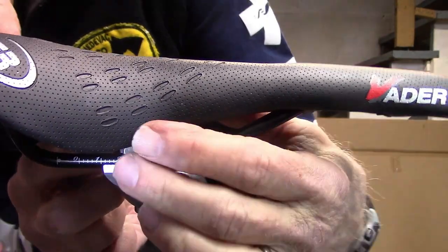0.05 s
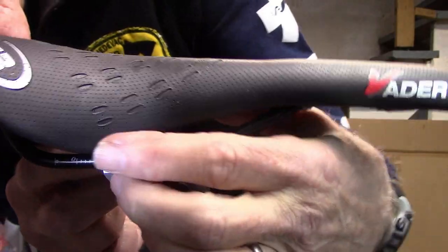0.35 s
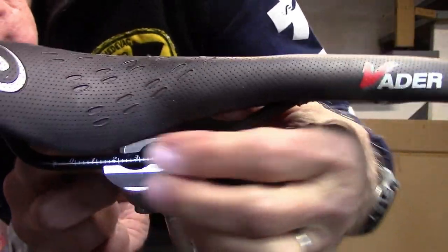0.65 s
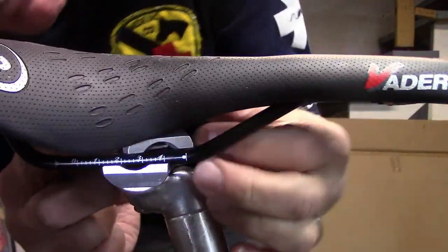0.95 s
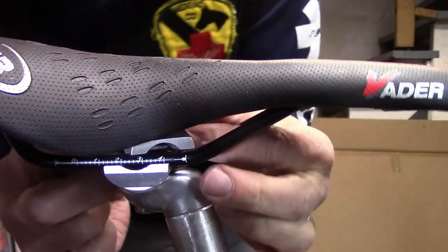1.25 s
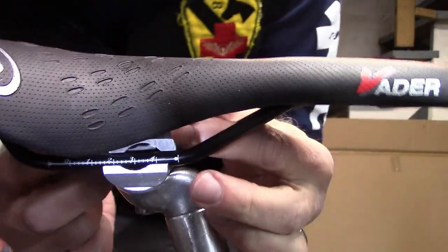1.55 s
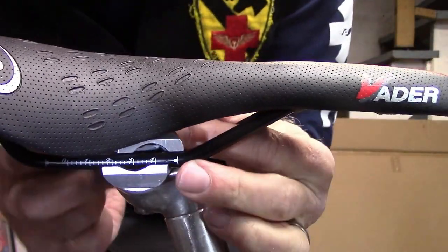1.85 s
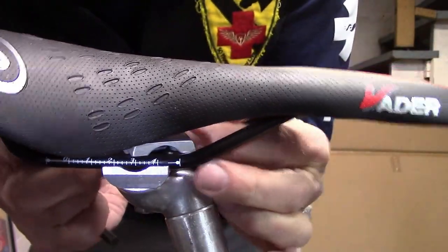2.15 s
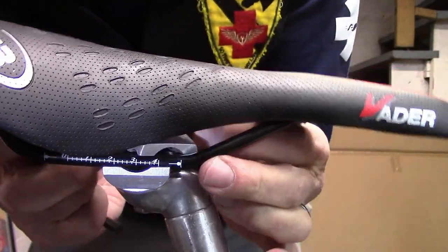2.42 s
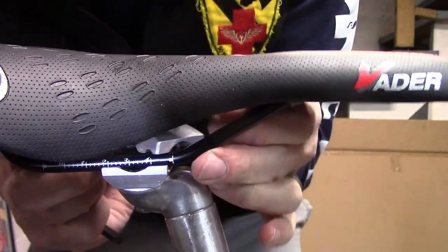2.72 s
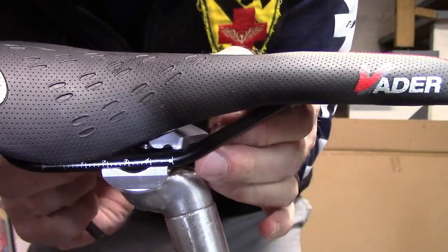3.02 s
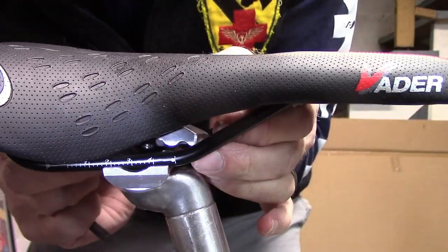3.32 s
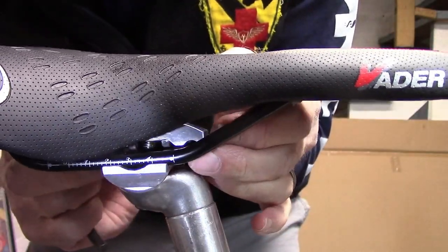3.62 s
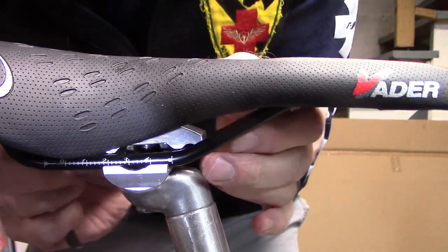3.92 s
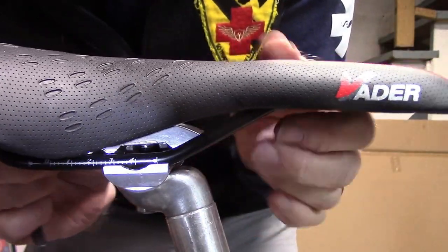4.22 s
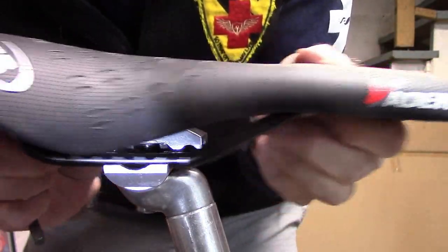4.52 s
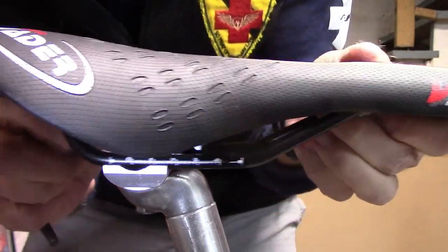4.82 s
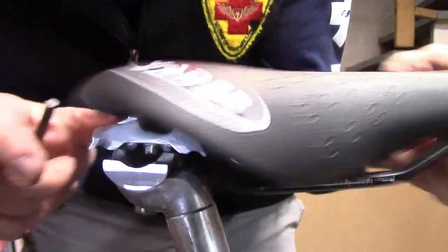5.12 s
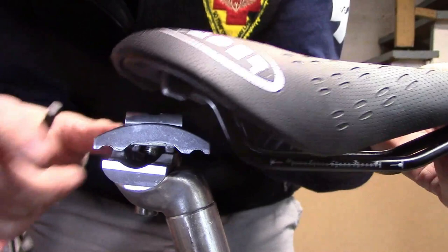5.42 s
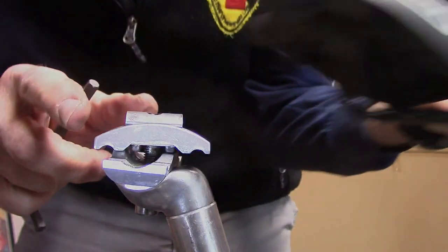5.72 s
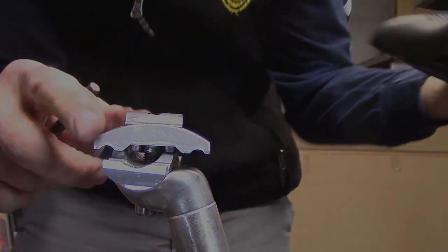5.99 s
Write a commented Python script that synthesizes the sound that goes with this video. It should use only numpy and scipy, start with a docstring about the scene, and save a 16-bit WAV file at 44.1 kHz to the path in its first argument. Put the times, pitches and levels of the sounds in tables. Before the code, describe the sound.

Hands work a bicycle saddle loose from its clamp, close to the microphone in a small workshop. The steel rails give light, irregular clicks and knocks, a loose bolt ticks, and fingers rub softly with faint creaks. Near the end the rails scrape out and the freed metal plate clatters brightly onto the seatpost. A fan runs quietly throughout.

```python
"""Working a bicycle saddle loose

In a small workshop, hands work a saddle out of its seatpost clamp. Its steel rails knock in the clamp,
the loose bolt ticks and fingers rub the saddle. Then the rails scrape out and the freed top plate
clatters down on the post. Each hit is a short pulse that sets metal ringing; each rub is many tiny
slips over a hiss. A fan runs steadily behind."""
import sys
import numpy as np
from scipy import signal
from scipy.fft import rfft, irfft
from scipy.io import wavfile
from scipy.ndimage import uniform_filter1d, minimum_filter1d

SR = 44100
rng = np.random.default_rng(int(sys.argv[2]) if len(sys.argv) > 2 else 0)


def file_out(sig):
    """Save sig as 16-bit WAV at sys.argv[1]."""
    # one column per channel
    cols = np.atleast_2d(sig).T
    # limit, then scale
    lim = np.clip(cols, -1, 1)
    pcm = np.round(lim * 32767).astype(np.int16)
    wavfile.write(sys.argv[1], SR, pcm)


N = 266849
TIME = np.arange(N) / SR

# Pitches the gripped rails favour or weaken. Each row: pitch in Hz, width in Hz, boost or cut in dB.
RAIL_RESONANCES = [(900, 200, -3.5), (1183, 240, 6), (1940, 360, 4.5), (2620, 270, 2), (3264, 150, 3.5),
                   (3520, 520, -2), (4320, 580, 3.5)]
# How strongly skin and sleeve rub the saddle. Each row: time in seconds, relative level in dB.
HAND_EFFORT = [(0, -68), (.35, -57), (.95, -52.5), (1.4, -54.5), (1.7, -57.5), (2.4, -54), (2.85, -59.5),
               (4.3, -56), (4.6, -50.5), (4.72, -57), (5.25, -53), (5.45, -65), (6.05, -56)]


def rail_knocks():
    """The rails knock in the clamp, some hard and some faintly, and the saddle's shell bumps the post."""
    # Each row: start in seconds, ring level in dB, ring pitch in Hz, ring width in Hz,
    # shell thud in dB, steel crack in dB, treble limit in Hz. Levels are relative.
    knocks = [(0.3955, 3.5, 1850, 2000, 6, -5.5, 8400), (0.592, 11, 2050, 800, -4, -15.5, 6800),
              (1.2878, 4, 2180, 1650, -5, -17, 10600), (1.53, 15, 2270, 1900, 9, -1, 7700),
              (1.8325, 18, 2250, 1210, 3.5, -4.5, 5300), (2.1156, 17.5, 2090, 1150, -10, -7, 8140),
              (2.5029, 14, 1960, 1200, -7, -5, 7800), (2.6028, 9, 2160, 1300, -13, -6.5, 6900),
              (2.60385, 12.5, 2180, 1320, 2, -18, 6800), (3.1472, 14, 2010, 1270, 0, -14, 4300),
              (3.3782, 7.5, 2470, 2170, -1, -7, 7150)]
    # Bumps are nearly all thud. Each row: start in seconds, relative thud level in dB.
    shell_bumps = [(0.5244, 0), (0.8053, -2), (3.0654, 5.5), (4.25, -4.5), (4.3721, -4.5), (4.5544, -1.5),
                   (4.7082, 7), (5.0081, 5.5)]
    # Faint knocks of the rails in the clamp are mostly ring.
    # Each row: start in seconds, relative ring level in dB, pitch in Hz.
    faint_knocks = [(0.82, -10, 2300), (0.9256, -6.5, 1700), (0.95, -11, 1490), (1.004, -10.5, 1600),
                    (1.058, -13, 1900), (1.1355, -6, 1990), (1.2549, -1, 2550), (1.3, -5, 2300),
                    (1.3439, -7, 1900), (1.3652, -9.5, 2700), (1.444, -8.5, 2600), (1.4625, -6, 1780),
                    (2.0879, 4.5, 2200), (2.5207, 3, 1910), (2.6974, -3.5, 1830), (2.9222, -3, 1840),
                    (3.6668, 0.5, 2220), (3.6896, -5, 1750), (3.8214, -1.5, 2500), (4.8898, -2, 2940),
                    (4.9779, 0.5, 2100), (5.3178, -8, 3060)]
    bumps = [(start, db - 21.5, 1200, 1320, db, db - 41, 2600) for start, db in shell_bumps]
    faint = [(start, db, hz, 1380, db - 6, db - 20, 5360) for start, db, hz in faint_knocks]
    rows = knocks + bumps + faint
    return amp(-4) * play_hits(rows, RAIL_RESONANCES, smear_s=0.00094, shiver_db=-4.5,
                               fade_s=0.034, dull_hz=8200)


def bolt_ticks():
    """The loose bolt ticks in its seat. It is small and hard, so it sounds bright."""
    # Each row: start in seconds, ring level in dB, ring pitch in Hz, ring width in Hz,
    # thud in dB, crack in dB. Levels are relative.
    ticks = [(1.123, -16, 7400, 3000, -27, -27.5), (2.1298, 2.5, 11940, 800, -9, -18.5),
             (2.286, -27, 7160, 1200, -15.5, -34), (2.5417, -4, 11850, 700, -22, -20.5),
             (3.3, -27, 10100, 1900, -39, -44), (3.378, -10, 11600, 1200, -35, -32),
             (5.2261, -8.5, 7710, 1400, -35, -28.5), (5.2621, -6, 11000, 1800, -24, -21),
             (5.2630, -4, 14100, 250, -28, -23)]
    treble_hz = 14300
    rows = [(*tick, treble_hz) for tick in ticks]
    return amp(2.5) * play_hits(rows, RAIL_RESONANCES, smear_s=0.00088, shiver_db=-3,
                                fade_s=0.022, dull_hz=10000)


def plate_clatter():
    """The freed plate falls on the post and bounces, ringing with no hand to quiet it. One jolt also sets the
    bolt ringing high, near 11.5 and 14 kHz."""
    # Each row: start in seconds, ring level in dB, ring pitch in Hz, ring width in Hz, # thud in dB, crack in
    # dB, treble limit in Hz. Levels are relative. # The rows at 5.0890 and 5.0905 s are the bolt, set ringing
    # by the falling plate.
    strikes = [(5.0597, 28, 3515, 560, 5.5, 16.5, 10000), (5.0650, 19, 5600, 900, 12, 19, 11700),
               (5.0695, 20, 3480, 500, 9.5, 10.5, 10000), (5.0890, 34, 11480, 450, 6.5, 12, 11500),
               (5.0905, 15, 14100, 250, -7, 3, 14500), (5.1004, 26.5, 5700, 800, 2.5, 4, 7980),
               (5.1022, 20, 2280, 2200, 1.5, 3.5, 8000), (5.1116, 8, 1680, 1700, -12.5, -6.5, 12530),
               (5.1421, 3, 2250, 900, 0, -4, 11600)]
    # The tone of plate on post. Each row: pitch in Hz, width in Hz, boost or cut in dB.
    post_resonances = [(286, 76, 8), (607, 130, 8.5), (920, 320, -5), (4400, 600, -2)]
    hits = play_hits(strikes, post_resonances, smear_s=0.0016, shiver_db=-2.5,
                     fade_s=0.077, dull_hz=9000)
    return ring_plate(amp(-4.5) * hits, ring_db=-14.5, freedom=0.87)


def ring_plate(hits, ring_db, freedom):
    """Adds the plate's ring to the hits. Freedom is the share of its ringing time that it keeps."""
    # Each row: pitch in Hz, relative level in dB, seconds to fade by 60 dB when fully free.
    plate_tones = [(596, 1, 0.089), (1260, 2.5, 0.08), (1550, -1, 0.09), (1900, 1.5, 0.0784),
                   (2260, -9.5, 0.1), (2560, -2, 0.11), (3480, -1.5, 0.111), (3693, -4, 0.1),
                   (4290, 1.5, 0.13), (5060, -4, 0.07), (5735, -10, 0.045), (6270, -2, 0.1),
                   (8600, -3.5, 0.08), (11480, 7, 0.018), (14100, 2, 0.11)]
    t = np.arange(SR // 2) / SR
    ring = sum(amp(db) * 10 ** (-3 * t / (fade_s * freedom)) * np.sin(2 * np.pi * hz * t)
               for hz, db, fade_s in plate_tones)
    return hits + amp(ring_db) * signal.oaconvolve(hits, ring / np.linalg.norm(ring))[:N]


def play_hits(rows, body, smear_s, shiver_db, fade_s, dull_hz, size=2048):
    """Plays a list of hits on one body. Each is slightly smeared and gets its own shiver."""
    out = np.zeros(N)
    lead = 64  # samples of room for a soft start
    smear = bending_delay(np.fft.rfftfreq(size, 1 / SR), smear_s)
    for start, *settings in rows:
        pulse = irfft(rfft(hit(*settings, body, size)) * smear)
        pulse = np.roll(pulse, lead) * signal.windows.tukey(size, lead / size)
        add(out, start - lead / SR, signal.fftconvolve(pulse, shiver(shiver_db, fade_s, dull_hz)))
    return out


def hit(ring_db, ring_hz, ring_width, thud_db, crack_db, treble_hz, body, size):
    """One hit: a short ring, the shell's thud, a crack of steel and the thin snap of first touch."""
    # Small steel parts that every hit shakes. Each row: pitch in Hz, width in Hz, relative level in dB.
    steel_parts = [(3210, 5800, 2.5), (4390, 490, -10), (5680, 710, 7.5), (7100, 2010, 0), (8240, 310, 6),
                   (9570, 400, 3.5), (11200, 1100, -1), (11850, 330, -1), (14100, 240, -7)]
    f = abs(np.fft.fftfreq(size, 1 / SR))
    ring = amp(ring_db) * resonance(f, ring_hz, ring_width) ** 0.89
    bass_loss = f / np.hypot(f, 232)  # the small shell gives off little deep sound
    thud = amp(thud_db) * resonance(f, 570, 1180) ** 0.73 * bass_loss
    crack = amp(crack_db) * np.sqrt(summed_resonances(f, steel_parts))
    snap = amp(crack_db - 24) / np.sqrt(1 + (f / 13000) ** 12)
    power = (ring ** 2 + thud ** 2 + crack ** 2) / (1 + (f / treble_hz) ** 12) + snap ** 2
    body_tone = amp(sum(db * resonance(f, hz, width) for hz, width, db in body))
    # Each spot that is struck favours slightly different pitches.
    spot_tone = amp(np.interp(f, np.geomspace(500, SR / 2, 24), 1.3 * rng.standard_normal(24)))
    return sharpest_pulse(np.sqrt(power) * body_tone * spot_tone)


def shiver(shiver_db, fade_s, dull_hz, size=4096):
    """A click, then an uneven shiver through rails and post that fades by 60 dB in fade_s."""
    t = np.arange(size) / SR
    flicker = amp(3.1 * unit_level(uniform_filter1d(rng.standard_normal(size), size=50)))
    rise_and_fall = (1 - np.exp(-t / 0.00073)) * 10 ** (-3 * t / fade_s)
    shake = flicker * rng.standard_normal(size) * rise_and_fall
    soften = signal.butter(1, dull_hz, fs=SR)
    return (t == 0) + amp(shiver_db) * signal.lfilter(*soften, shake / np.linalg.norm(shake))


def bending_delay(f, smear_s):
    """Waves that bend the metal arrive at different times, treble first, which smears a click."""
    delay = np.interp(f, np.geomspace(300, SR / 2, 40), rng.random(40) * smear_s)
    delay /= np.sqrt(np.maximum(f / 2500, 1))  # higher waves arrive ever closer together
    return np.exp(-2j * np.pi * np.cumsum(delay) * f[1])


def rail_scrape():
    """The scrape swells until the rails slip free of their grooves, then stops."""
    # Each row: pitch in Hz, relative level in dB.
    scrape_tone = [(100, -31), (330, -0.5), (560, 5), (850, -11), (1400, -2.5), (2200, -3.5), (3100, -3),
                   (4300, -18), (5800, -13), (9500, -36), (11900, -21), (15000, -55)]
    pull = amp(-30.5) * stroke(peak_s=5.008, rise_s=0.059, fall_s=0.016)
    return friction(pull, scrape_tone, slips_per_s=330, spread_db=2, hiss_db=-8)


def hand_rub():
    """Skin and sleeve rub the saddle with a soft, low hiss."""
    # Each row: pitch in Hz, relative level in dB.
    rub_tone = [(60, -35), (200, -0.5), (420, -3.5), (900, -2), (2500, -8), (5000, -21), (11000, -32),
                (15000, -48)]
    return amp(-5.5) * friction(level(HAND_EFFORT), rub_tone, slips_per_s=280, spread_db=-2, hiss_db=6.5)


def sleeve_swishes():
    """A sleeve brushes the saddle as the hand changes grip."""
    # Each row: loudest moment in seconds, fade in and out in seconds.
    brushes = [(3.96, 0.12), (4.17, .1), (4.52, .22)]
    # Each row: pitch in Hz, relative level in dB.
    cloth_tone = [(1000, -26), (3000, 3.5), (7000, 0), (11500, -4), (14500, -23)]
    gain = amp(-65) * sum(stroke(peak_s, fade_s, fade_s) for peak_s, fade_s in brushes)
    return friction(gain, cloth_tone, slips_per_s=2200, spread_db=6, hiss_db=6)


def rail_creaks():
    """The rails slip in small jerks under the hands, and each jerk makes the metal shiver."""
    # Each row: pitch in Hz, relative level in dB.
    creak_tone = [(100, -30), (330, 4), (800, -6.5), (1400, 2.5), (2700, -6), (5000, -17.5), (12000, -27.5)]
    slips = amp(-7.5) * friction(level(HAND_EFFORT), creak_tone, slips_per_s=70, spread_db=2, hiss_db=-10)
    return signal.oaconvolve(slips, shiver(shiver_db=7, fade_s=0.05, dull_hz=5970))[:N]


def bolt_turn():
    """Fingertips drag on the bolt's ribbed head."""
    # Each row: pitch in Hz, relative level in dB.
    drag_tone = [(400, -18), (1400, 8), (2800, -5), (4200, -7), (8000, -22), (14000, -35)]
    gain = amp(-63) * stroke(peak_s=1.5, rise_s=0.57, fall_s=0.41)
    return friction(gain, drag_tone, slips_per_s=300, spread_db=0, hiss_db=-4)


def friction(gain, tone, slips_per_s, spread_db, hiss_db):
    """Sliding surfaces make tiny slips of uneven size over a smooth hiss."""
    slipping = rng.random(N) < slips_per_s / SR
    sizes = amp(spread_db * np.minimum(rng.exponential(1, N), 3.5))
    slips = unit_level(slipping * sizes * rng.choice([-1, 1], N))
    hiss = amp(hiss_db) * rng.standard_normal(N)
    return gain * unit_level(shape_tone(slips + hiss, tone))


def fan():
    """Rushing air sings in the fan's housing. Returns the centre sound and the left-right difference."""
    # The rushing air. Each row: pitch in Hz, relative level in dB.
    air_tone = [(25, -20), (60, -15.5), (105, -9), (140, -4.5), (400, -2.5), (680, -5.5), (860, -10.5),
                (1150, -5.5), (2050, -5.5), (2800, -9), (3300, -7.5), (4300, -13.5), (5900, -13.5),
                (10000, -25.5), (15000, -37.5)]
    # The housing. Each row: pitch in Hz, width in Hz, level above the air noise in dB.
    housing_resonances = [(61.3, 5.8, 6.5), (125.3, 9.8, 5.5), (350, 51, -0.5), (668, 39, 9),
                          (1048.5, 11.5, 23), (1111, 14, 11.5), (1308, 25, 11.5), (1453, 170, 6.5),
                          (1743, 14, 16.5), (1900, 16, 11.5), (1960, 14, 14.5), (2237, 14.3, 16),
                          (2600, 34, 6.5)]
    # How wide the fan sounds. Each row: pitch in Hz, level of the side against the centre in dB.
    stereo_width = [(60, -3.5), (110, -15.5), (200, -8), (380, -9), (700, -11.5), (1290, -16.5),
                    (2380, -15.5), (4400, -12), (8120, -10), (15000, -28.5)]
    f = np.fft.rfftfreq(N, 1 / SR)
    housing = np.sqrt(1 + summed_resonances(f, housing_resonances))
    tone = amp(value_at(air_tone, f)) * housing
    centre, side = (amp(-49) * unit_level(irfft(rfft(noise) * tone, N))
                    for noise in rng.standard_normal((2, N)))
    return centre, shape_tone(side, stereo_width)


def early_echoes(x):
    """The person's chest and the bench throw back two quick, dull echoes."""
    out = np.zeros(N)
    dull = signal.lfilter(*signal.butter(1, 4000, fs=SR), x)
    add(out, 0.0048, amp(-23) * dull)
    add(out, 0.0105, amp(-27) * dull)
    return out


def room(x, gain_db):
    """The room's echoes blur into a short tail, each pitch dying at its own speed."""
    # Each row: pitch in Hz, seconds to fade by 60 dB.
    fade_times = [(150, 0.13), (600, 0.17), (2500, 0.17), (6000, 0.23), (9000, 0.12), (14000, 0.093)]
    # Each row: pitch in Hz, boost or cut in dB.
    room_tone = [(100, -0.5), (500, 11), (2500, -1), (6000, -1.5), (12000, -6)]
    hz, t, noise = signal.stft(rng.standard_normal(SR // 2), SR, nperseg=256)
    fade = 10 ** (-3 * t / value_at(fade_times, hz)[:, None])
    tail = signal.istft(noise * fade, SR, nperseg=256)[1]
    tail *= np.clip(np.arange(len(tail)) / SR / 0.0072, 0, 1)  # the echoes take a moment to build
    return amp(gain_db) * signal.oaconvolve(shape_tone(x, room_tone), tail / np.linalg.norm(tail))[:N]


def amp(db):
    """Turns decibels into a gain to multiply by."""
    return 10 ** (np.asarray(db) / 20)


def unit_level(x):
    """Scales a sound to an average power of 1."""
    return x / np.sqrt(np.mean(x ** 2) + 1e-20)


def value_at(points, hz):
    """Reads between the rows of a table, with octaves evenly spaced."""
    pitches, values = np.transpose(points)
    return np.interp(np.log(hz + 1), np.log(pitches + 1), values)


def level(curve):
    """Turns a curve in dB into a gain over time, silent beyond its ends."""
    return amp(np.interp(TIME, *np.transpose(curve), left=-120, right=-120))


def stroke(peak_s, rise_s, fall_s):
    """The gain of one slide: it grows tenfold in rise_s and drops tenfold in fall_s."""
    return 10 ** -np.maximum((peak_s - TIME) / rise_s, (TIME - peak_s) / fall_s)


def add(mix, start, sound):
    """Mixes a sound in at a start time in seconds."""
    part = mix[max(round(start * SR), 0):][:len(sound)]
    part += sound[:len(part)]


def shape_tone(x, tone):
    """Turns each pitch up or down by the dB in a table."""
    f = np.fft.rfftfreq(len(x), 1 / SR)
    return irfft(rfft(x) * amp(value_at(tone, f)), len(x))


def resonance(f, hz, width):
    """How much power a part gives back at each pitch: 1 at its own pitch, less further away."""
    return 1 / (1 + ((f * f - hz * hz) / (f * width + 1e-9)) ** 2)


def summed_resonances(f, rows):
    """The power of several resonances together."""
    return sum(amp(db) ** 2 * resonance(f, hz, width) for hz, width, db in rows)


def sharpest_pulse(gain):
    """The quickest pulse that has the given strength at each pitch."""
    log_gain = np.log(np.maximum(gain, 1e-5))
    return np.fft.ifft(np.exp(np.conj(signal.hilbert(log_gain)))).real


def limit(x, ceiling=0.95, size=45):
    """Briefly turns down the loudest peaks."""
    gain = ceiling / np.maximum(abs(x).max(0), ceiling)
    return x * uniform_filter1d(minimum_filter1d(gain, size), size)


def scene():
    """The work on the saddle sits close and near the centre; room and fan add some width."""
    gripped = ring_plate(rail_knocks() + bolt_ticks(), ring_db=-25.5, freedom=0.45)
    near = gripped + plate_clatter() + rail_scrape()
    near += hand_rub() + sleeve_swishes() + rail_creaks() + bolt_turn()
    fan_centre, fan_side = fan()
    centre = near + early_echoes(near) + room(near, gain_db=-16) + fan_centre
    # The microphone's two openings lie a hair apart, so they differ most in the treble.
    side = amp(-15) * np.gradient(near) + room(near, gain_db=-34.5) + fan_side
    return np.array([centre + side, centre - side])


def record(dry):
    """The microphone loses deep bass and high treble; then peaks are tamed and the very top is cut."""
    no_rumble = signal.lfilter(*signal.butter(2, 30, "high", fs=SR), dry)
    softened = signal.lfilter(*signal.butter(6, 15000, fs=SR), no_rumble)
    top_cut = signal.firwin(511, 16200, window=("kaiser", 9), fs=SR)
    return signal.oaconvolve(limit(softened), top_cut[None], "same")


dry = scene()
out = record(dry)
file_out(out)
```